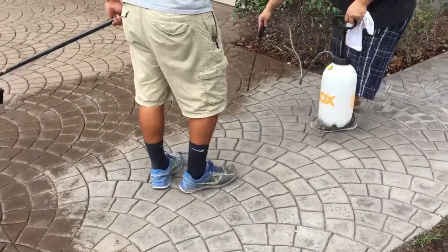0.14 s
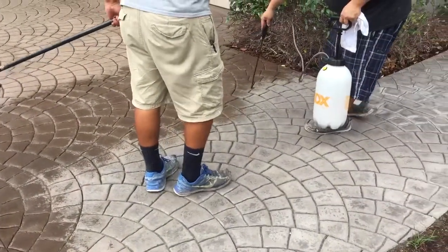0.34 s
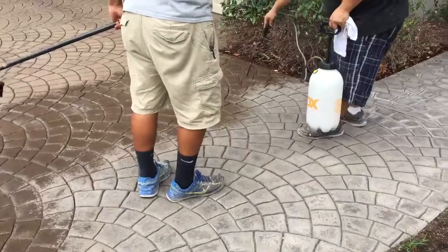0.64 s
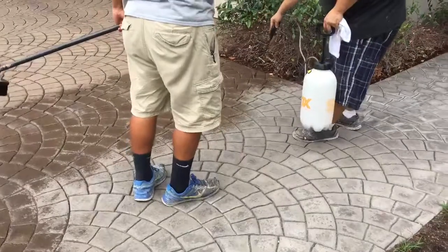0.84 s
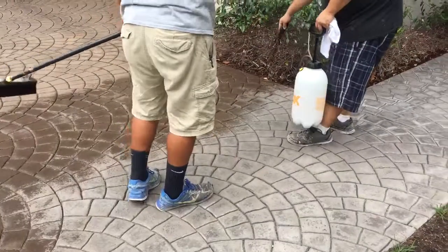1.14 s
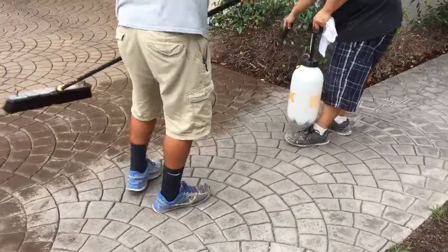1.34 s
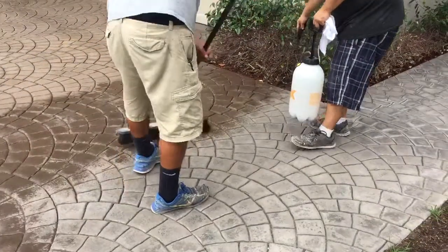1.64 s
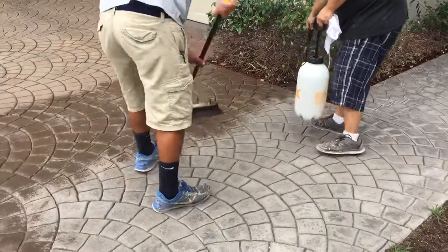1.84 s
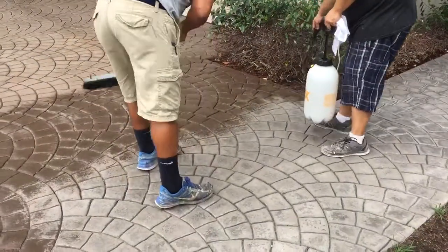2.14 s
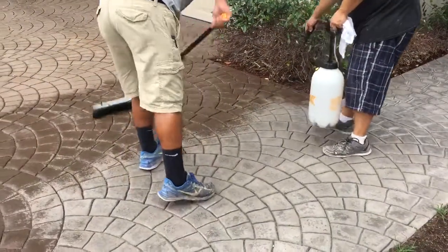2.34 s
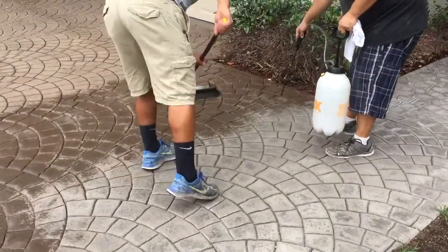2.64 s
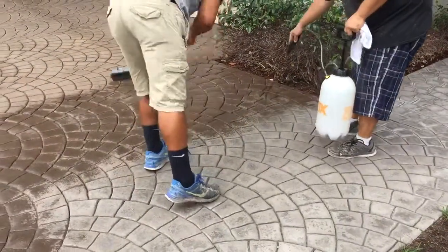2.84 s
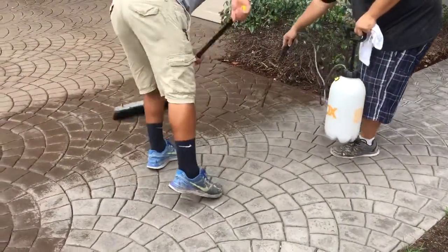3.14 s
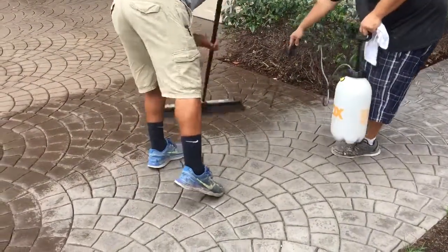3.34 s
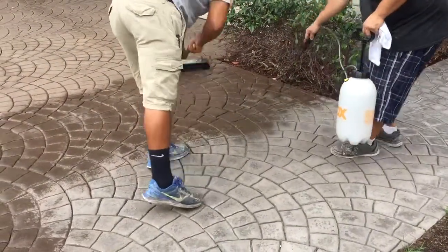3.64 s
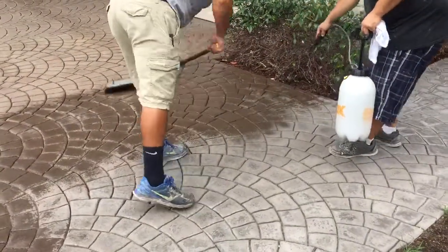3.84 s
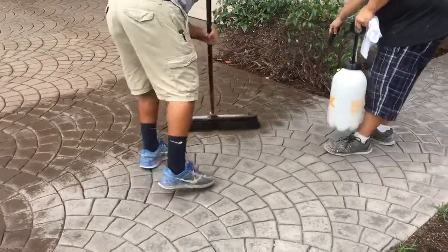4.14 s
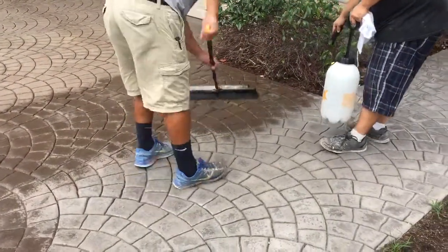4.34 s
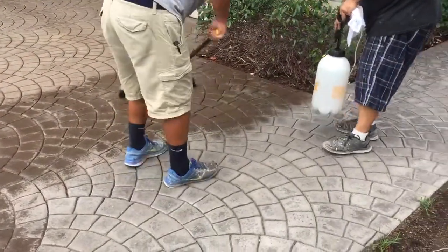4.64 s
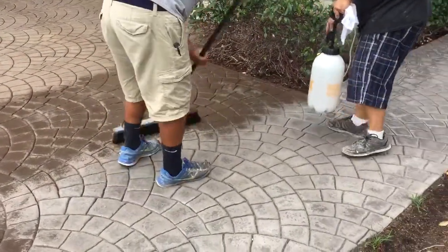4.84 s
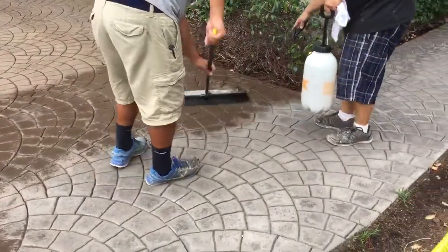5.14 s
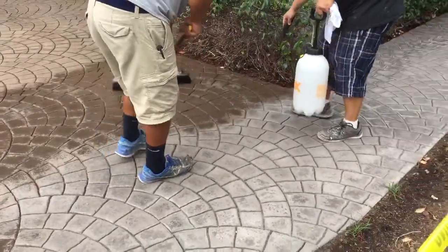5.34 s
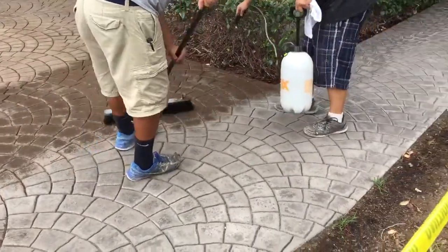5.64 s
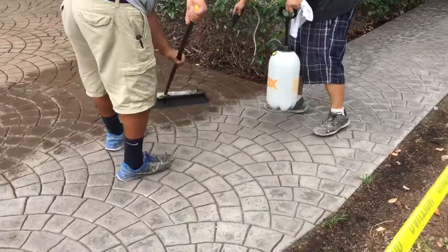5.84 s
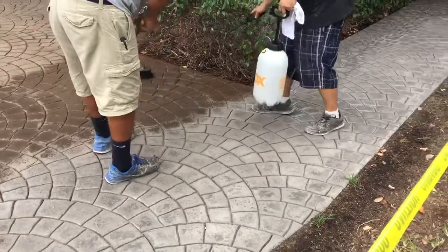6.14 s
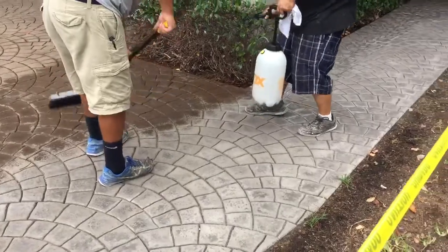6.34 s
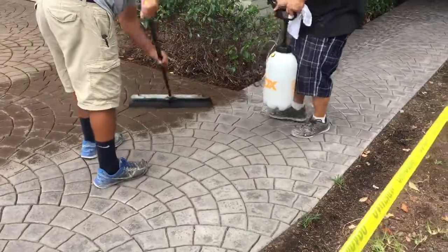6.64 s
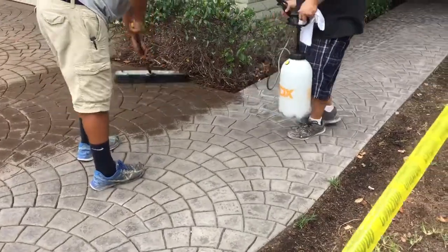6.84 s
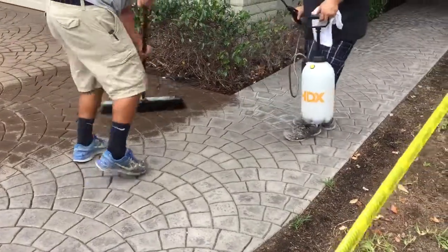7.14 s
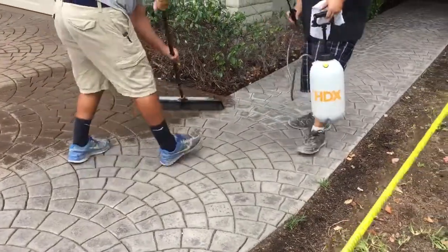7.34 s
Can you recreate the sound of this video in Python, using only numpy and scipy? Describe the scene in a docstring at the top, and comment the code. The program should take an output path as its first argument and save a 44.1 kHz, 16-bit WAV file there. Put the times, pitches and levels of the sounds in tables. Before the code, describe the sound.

Outdoors, heard through one microphone and centred. From 0 to about 1.6 s a low engine drone throbs and wavers over faint distant traffic and airy hiss; a soft dull knock comes at 0.3 s, and tiny bristle ticks from 1.5 s. The drone fades out by 1.75 s. At 1.8 s a broom head lands on wet concrete with a quick woody tap, and scrubbing begins. Strokes of roughly 0.3 to 0.5 s follow, each swelling into a gritty, wet rasp and sizzle, then thinning at the turn; the one near 3.6 s is strongest, with a tiny high chirp. A clearer short squeak sounds at 5.2 s, a light tap at 5.5 s, fainter squeaks near 6.0 and 6.8 s. Strokes after 5.5 s are generally softer, with small ticks around 6.4 s. Road rumble swells around 7.1 s as scrubbing continues to the end at 7.5 s.

```python
"""An engine drones over distant traffic, with a knock and a few ticks of a broom; the drone fades before 1.8 s.
Then the push broom lands on wet stamped concrete and scrubs in quick strokes; a few bristles squeak.
Shaped noise and random flicks make the bristles, gliding tones the squeaks, decaying rings the head,
beating low tones the engine and patchy noise bands the road. One microphone, outdoors."""
import sys
import numpy as np
from scipy import signal
from scipy.fft import rfft, irfft, next_fast_len
from scipy.io import wavfile
from scipy.ndimage import uniform_filter1d, map_coordinates

SR = 44100
rng = np.random.default_rng(int(sys.argv[2]) if len(sys.argv) > 2 else 0)


def bounce(signal):
    """Save signal as a 16-bit WAV file at the path given by the first command-line argument."""
    frames = np.transpose(np.atleast_2d(signal))
    limited = np.clip(frames, -1, 1)
    pcm = np.round(limited * 32767).astype(np.int16)
    wavfile.write(sys.argv[1], SR, pcm)


N = 330309

# contacts of the broom with the ground: t/s, tick level/dB, thud over the tick level/dB,
# tick centre f/Hz, tick t60/s
CONTACTS = [(0.2793, -54.5, 8.5, 2620, 0.057), (1.521, -66, -30, 7490, .03), (1.635, -64, -30, 13000, .02),
            (1.706, -70, -30, 12990, .12), (1.8112, -46, -4, 1800, 0.04), (1.8165, -42.5, 8, 1520, 0.02),
            (1.847, -52, -9, 1100, 0.065), (5.5318, -46.5, -16, 2320, 0.031), (6.389, -62, -30, 9000, .02),
            (6.4128, -57, -12, 6000, .03)]
LANDING = 4  # row of the contact that starts the scrubbing


def amp(db):
    """Decibels to gain."""
    return 10 ** (np.asarray(db) / 20)


def unit(x):
    """Scaled to rms 1."""
    return x / np.sqrt(np.mean(x ** 2) + 1e-20)


def curves(rows):
    """One value per sample for each column after the time."""
    seconds, *columns = np.transpose(rows)
    return [np.interp(np.arange(N) / SR, seconds, column) for column in columns]


def wobble(rate):
    """A smooth random curve, rate knots a second."""
    knots = rng.standard_normal(int(N * rate / SR) + 4)
    return map_coordinates(knots, [np.arange(N) * rate / SR])


def filtered(x, response):
    """x times a response of frequency."""
    m = next_fast_len(N + 8192)
    spectrum = rfft(x, m) * response(np.fft.rfftfreq(m, 1 / SR))
    return irfft(spectrum, m)[..., :N]


def coloured(x, spectrum):
    """x through (f/Hz, level/dB) points on a log frequency axis, -120 dB outside them."""
    f, db = np.transpose(spectrum)

    def response(hz):
        return amp(np.interp(np.log(hz + 1), np.log(f), db, left=-120, right=-120))

    return filtered(x, response)


def rush(spectrum, patchy_db):
    """Coloured noise of rms 1 with broad and narrow patches of random gain."""
    z = signal.stft(rng.standard_normal(N), nperseg=512)[2]
    broad = uniform_filter1d(rng.standard_normal(z.shape), size=6, axis=0)  # over frequency
    broad = uniform_filter1d(broad, size=8, axis=1)  # over time
    narrow = uniform_filter1d(rng.standard_normal(z.shape), size=10, axis=1)
    z = z * amp(patchy_db * unit(broad) + 2.97 * unit(narrow))
    noise = signal.istft(z, nperseg=512)[1][:N]
    return unit(coloured(noise, spectrum))


def broom():
    """Flicks and small slips over a wet sizzle; the joints of the paving make the stroke uneven."""
    # colours of the bristles on the wet ground: f/Hz, relative level/dB per Hz
    sizzle_colour = [(5000, -43), (8000, -4), (10000, 0), (15700, 0.5), (17000, -26)]
    hiss_colour = [(2000, -28), (4000, -7.5), (6000, -1.5), (7500, -1), (9500, -10.5), (13000, -19)]
    rasp_colour = [(300, -38), (700, -3), (1500, -5.5), (2500, -2), (3500, 0), (5000, -0.5), (8000, -36)]
    level, rasp_db, hiss_db = strokes()
    down = np.arange(N) > CONTACTS[LANDING][0] * SR  # silent until the head lands
    joints_db = 0.98 * wobble(14) + 0.51 * wobble(60)

    tips = flicks(6000, spread_db=1.8)  # the same tips sound in sizzle and hiss
    sizzle_tips = unit(coloured(tips, sizzle_colour))
    sizzle = unit(rush(sizzle_colour, patchy_db=1.5) + 0.43 * sizzle_tips)
    hiss_tips = unit(coloured(tips, hiss_colour))
    hiss = unit(rush(hiss_colour, patchy_db=1.5) + 0.53 * hiss_tips)
    rasp_tips = unit(coloured(flicks(3000, spread_db=1.8), rasp_colour))
    rasp = unit(rush(rasp_colour, patchy_db=1.6) + 0.6 * rasp_tips)
    slips = chirrups(count=2500, centre_hz=4484, spread_db=1.5)

    bristles = amp(2.0) * sizzle + amp(hiss_db + 3.5) * hiss
    head = amp(rasp_db) * (rasp + 0.44 * slips)
    return down * level * amp(joints_db) * (bristles + head)


def strokes():
    """The head speeds up from each turn and slows into the next; the sound follows its speed."""
    # one row a stroke: turn t/s, fastest t/s, base level at the turn/dB, base level at the fastest/dB,
    # dull drag at the turn/dB, rasp trim/dB, hiss trim/dB, tilt of the rasp along the stroke/dB
    rows = [(1.833, 2.022, -67, -52.5, 4, 1, -1, 10), (2.3, 2.47, -65.5, -53, -2, -2, -1.5, 10),
            (2.674, 2.788, -61.5, -52, 1.5, 1, -1, 4), (3.037, 3.24, -68.5, -53, -0.5, -1.5, -1.5, 0),
            (3.44, 3.608, -60.5, -48.5, 3, -1.5, -2, 2), (3.847, 4.09, -69, -53.5, 11.5, -2.5, -2.5, 4),
            (4.322, 4.445, -56, -49.5, 0.5, -1, -1, -4), (4.68, 4.957, -73.5, -55, 1, -1, -1, 0),
            (5.054, 5.24, -57, -50.5, 2, 0.5, -0.5, 0), (5.514, 5.704, -76, -60, 0, -3, -2, -6),
            (5.913, 6.052, -62, -53, -0.5, 1.5, 0, 5), (6.356, 6.504, -91, -59, -4, -2, -3, 0),
            (6.56, 6.884, -59, -51, -2, 0.5, 0, -3), (7.076, 7.256, -72, -56, -1.5, -0.5, -3, 2),
            (7.32, 7.395, -59, -56, -0.5, -3, -1.5, -2)]
    # the turn that ends the last stroke: t/s, base level/dB
    last_turn = (7.6, -59)
    speed_up, slow_down = 1.94, 1.85  # powers of the sine that shapes the speed
    drag_s = 0.057  # from the turn until the drag's dB fall to 1/e

    t = np.arange(N) / SR
    turn, fast, turn_db, fast_db, drag_db, rasp_db, hiss_db, tilt_db = np.transpose(rows)
    k = np.clip(np.searchsorted(turn, t) - 1, 0, None)  # the stroke under way
    end = np.append(turn[1:], last_turn[0])[k]
    end_db = np.append(turn_db[1:], last_turn[1])[k]

    rising = t < fast[k]
    way = np.where(rising, (t - turn[k]) / (fast - turn)[k], (end - t) / (end - fast[k]))
    speed = np.sin(np.pi / 2 * np.clip(way, 0, 1)) ** np.where(rising, speed_up, slow_down)
    slow_level = amp(np.where(rising, turn_db[k], end_db))
    level = slow_level * (1 - speed) + amp(fast_db[k]) * speed

    drag = sum(db * np.exp(-((t - s) / drag_s) ** 2) for s, db in zip(turn, drag_db))
    progress = (t - turn[k]) / (end - turn[k])
    tilt = tilt_db[k] * np.sqrt(speed) * (progress - 0.5)
    rasp_curve = drag + tilt + np.interp(t, fast, rasp_db)
    hiss_curve = 0.7 * drag + np.interp(t, fast, hiss_db)
    return level, rasp_curve, hiss_curve


def flicks(per_second, spread_db):
    """Bristle tips let go at random moments with uneven force."""
    lets_go = rng.random(N) < per_second / SR
    force = amp(spread_db * rng.exponential(size=N))
    return lets_go * force * rng.choice([-1, 1], N)


def chirrups(count, centre_hz, spread_db):
    """Tiny slips of single bristles: short rising tones at random moments, together of rms 1."""
    draw = rng.random((count, 4))  # moment, pitch, life, strength
    t = np.arange(SR // 40) / SR
    hz = np.clip(centre_hz * np.exp(2.6 * (draw[:, 1:2] - 0.5)), 300, 15000)
    life = 0.0058 + 0.022 * draw[:, 2:3]  # s, cut short where the tone's buffer ends
    swell = np.sin(np.pi * np.clip(t / life, 0, 1)) ** 2
    strength = amp(-spread_db * np.log(draw[:, 3:] + 0.01))
    tones = strength * swell * np.sin(2 * np.pi * hz * t * (1 + 1.61 * t))
    at = (draw[:, :1] * N).astype(int) + np.arange(len(t))
    return unit(np.bincount(at.ravel(), tones.ravel(), N + SR)[:N])


def squeaks():
    """A bristle slips at a gliding rate, unsteadily, with some of its octave; a nearby wall answers."""
    # bristles that stick and slip: peak t/s, nominal level/dB, rise/s, fall/s, start f/Hz, peak f/Hz,
    # end f/Hz, octave over the tone level/dB
    rows = [(3.610, -31.5, 0.0055, 0.0063, 8300, 9850, 8600, -40),
            (5.211, -26.5, 0.0126, 0.0115, 5250, 5630, 5540, -14),
            (5.212, -40, 0.0041, .006, 6200, 6300, 6600, -30),
            (6.010, -41.5, .006, 0.0066, 4800, 4850, 4880, -2),
            (6.030, -43, .005, 0.0067, 5000, 5140, 5200, -20),
            (6.066, -55, .007, .006, 3300, 3800, 3950, -20),
            (6.345, -59.5, 0.033, 0.032, 1470, 1444, 1420, -30),
            (6.786, -41, 0.02, .007, 4650, 5500, 6300, -12)]
    out = np.zeros(N)
    t = np.arange(N) / SR
    flutter = amp(1.8 * wobble(400))
    jitter = 0.16 * wobble(900)  # radians
    for s, db, rise, fall, start_hz, peak_hz, end_hz, octave_db in rows:
        hz = np.interp(t, [s - rise, s, s + fall], [start_hz, peak_hz, end_hz])
        phase = 2 * np.pi * np.cumsum(hz) / SR + jitter
        moments = [s - 1.3 * rise, s - rise, s, s + fall, s + 1.3 * fall]
        swell_db = np.interp(t, moments, [-60, -8.0, -0.5, -13, -60], -200, -200)
        tone = np.sin(phase) + amp(octave_db) * np.sin(2 * phase)
        out += amp(db + swell_db) * tone
    tail = np.arange(SR // 8) / SR
    wall = rng.standard_normal(len(tail)) * amp(-60 * tail / 0.22)  # t60 0.22 s
    answer = signal.fftconvolve(out, wall / np.linalg.norm(wall))[:N]
    return out * flutter + amp(-12) * answer


def knocks():
    """Each contact is a soft-edged tick of bristles and a thud of the ringing head."""
    # ringing modes of the broom head: f/Hz, mean level/dB, t60/s
    head_modes = [(122, 1.5, 0.035), (188, 2, 0.024), (340, -8.5, 0.055), (950, -2, 0.022)]
    out = np.zeros(N + SR)
    t = np.arange(SR // 8) / SR
    soft_edge = 1 - np.exp(-t / 0.001)
    for s, db, thud_db, hz, t60 in CONTACTS:
        noise = rng.standard_normal(len(t))
        tick = unit(signal.lfilter(*signal.iirpeak(hz, 2.8, SR), noise)) + 0.23 * noise
        thud = np.zeros(len(t))
        for f, mode_db, life in head_modes:
            decay = amp(mode_db + rng.normal(0, 3.2) - 60 * t / life)
            thud += decay * np.sin(2 * np.pi * f * t)
        contact = amp(-60 * t / t60) * tick + amp(thud_db) * thud
        out[round(s * SR):][:len(t)] += amp(db) * soft_edge * contact
    return out[:N]


def drone():
    """Three low engine tones beat slowly, waver and fade as the vehicle leaves."""
    # engine tones: f/Hz, level before the swell/dB, beats a second/Hz, t of a dip/s, beat depth/0-1
    engine_tones = [(44.8, -49.5, 1.5, .45, .15), (76.2, -46, .55, .2, 0.43),
                    (122, -46.5, 1.47, 0.596, 0.51)]
    # overall swell and fade: t/s, level/dB
    swell = [(0, 3), (.5, -2), (.95, 2), (1.55, 0), (1.63, -8), (1.75, -30)]
    t = np.arange(N) / SR
    out = np.zeros(N)
    for hz, db, beats, dip, depth in engine_tones:
        beat = 1 - np.clip(depth, 0, 1) * np.cos(2 * np.pi * beats * (t - dip))
        level = amp(db + 1.4 * wobble(10.94))
        out += level * beat * np.sin(2 * np.pi * hz * t + 0.25 * wobble(12))
    present = t < swell[-1][0]
    return amp(curves(swell)[0]) * present * out


def traffic():
    """Far road noise in three parts and the faint hiss of open air."""
    # the road over time: t/s, rumble level/dB, roar level/dB, tyre level/dB
    road = [(0, -49, -61, -60.5), (1.3, -49, -63, -62.5), (1.7, -49.5, -65, -61.5), (3.0, -50, -63.5, -63),
            (5.0, -51, -61.5, -63.5), (6.5, -50.5, -63, -63), (6.8, -48.5, -58, -64), (7.15, -46, -55, -57),
            (7.49, -48, -56, -61)]
    # colours of the three road parts and the open air: f/Hz, relative level/dB per Hz
    rumble_colour = [(12, -54), (20, -36), (27, -15), (40, -9), (59, 3), (124, -1.5), (146, -10),
                     (200, -12.5), (260, -32.5), (440, -120)]
    roar_colour = [(88, -40), (150, -6), (226, -1), (371, -11), (520, -28.5), (680, -49), (1140, -120)]
    tyre_colour = [(280, -22), (480, -7), (518, -6.5), (994, -1), (1200, -8), (1710, -11), (2080, -20.5),
                   (3000, -35), (3900, -47), (6600, -120)]
    air_colour = [(1180, -36), (2000, -1), (2360, -6), (4860, -7), (6130, -11.5), (6980, -11.5),
                  (15700, -19.5)]
    rumble_db, roar_db, tyre_db = curves(road)
    rumble = amp(rumble_db + 0.66 * wobble(6)) * rush(rumble_colour, patchy_db=0.8)
    roar = amp(roar_db + 1.05 * wobble(8)) * rush(roar_colour, patchy_db=2.0)
    tyres = amp(tyre_db + 0.44 * wobble(14)) * rush(tyre_colour, patchy_db=1.6)
    air = amp(-69.5 + 0.57 * wobble(8.9)) * rush(air_colour, patchy_db=1.1)
    return rumble + roar + tyres + air


def scene():
    """One microphone feeds both channels."""
    mono = broom() + squeaks() + knocks() + drone() + traffic()
    return np.tile(mono, (2, 1))


def record(dry):
    """The housing carves narrow dips, the deepest bass rolls off and nothing passes above the band limit."""
    # dips of the microphone housing: centre f/Hz, width f/Hz, level/dB
    dips = [(4930, 480, -5.5), (10480, 580, -4.5), (7600, 440, -4)]
    bass_hz, top_hz = 30, 15760

    def microphone(hz):
        housing = amp(sum(db * np.exp(-((hz - centre) / width) ** 2) for centre, width, db in dips))
        bass = hz ** 2 / (hz ** 2 + bass_hz ** 2)
        return housing * bass * (hz < top_hz)

    return filtered(dry, microphone)


dry = scene()
out = record(dry)
bounce(out)
```